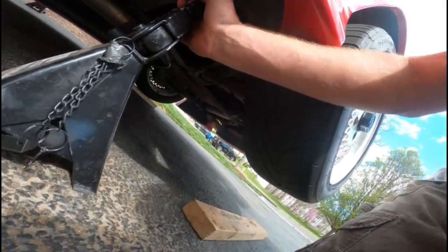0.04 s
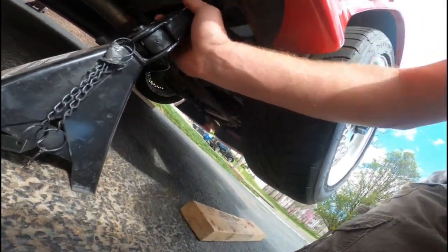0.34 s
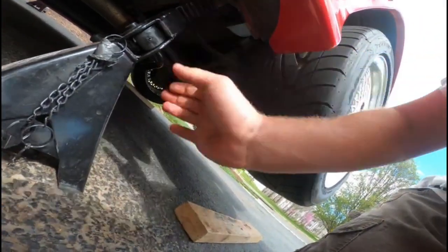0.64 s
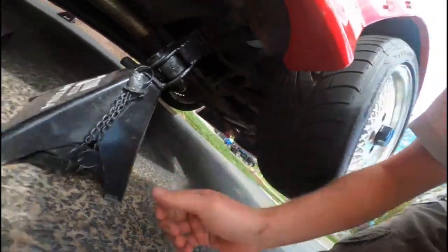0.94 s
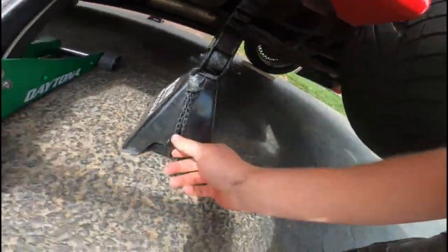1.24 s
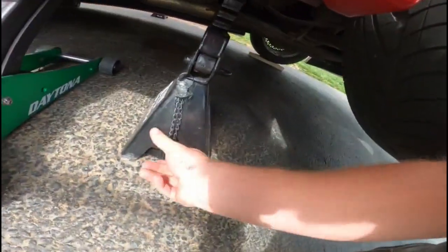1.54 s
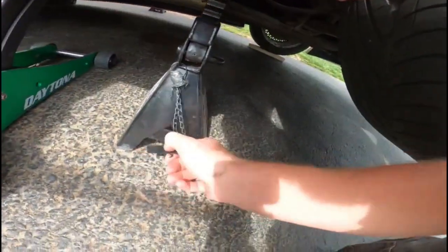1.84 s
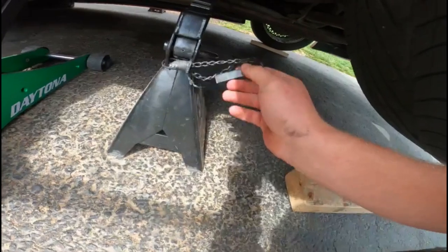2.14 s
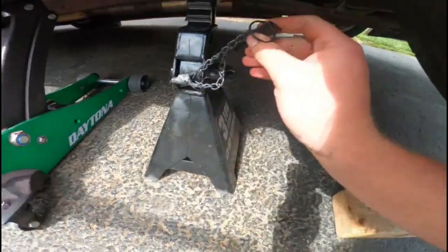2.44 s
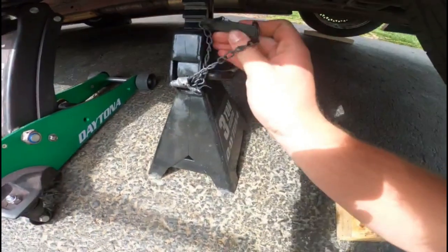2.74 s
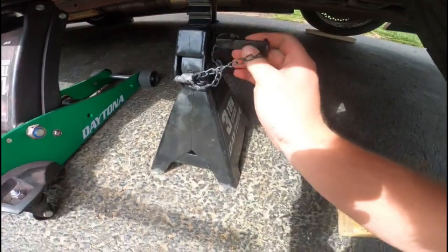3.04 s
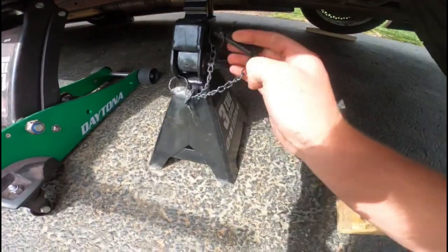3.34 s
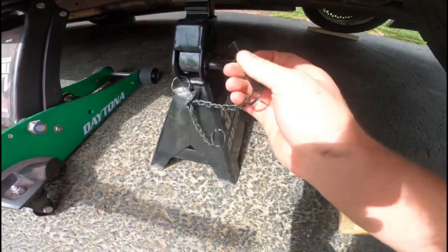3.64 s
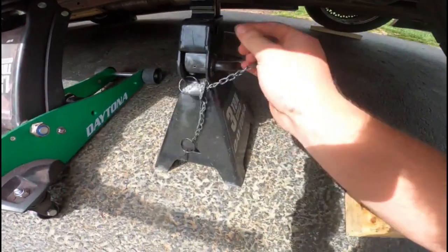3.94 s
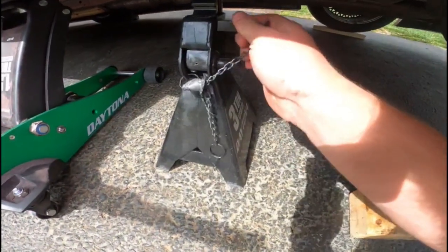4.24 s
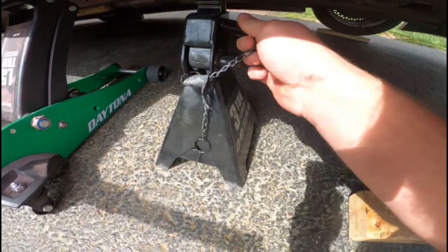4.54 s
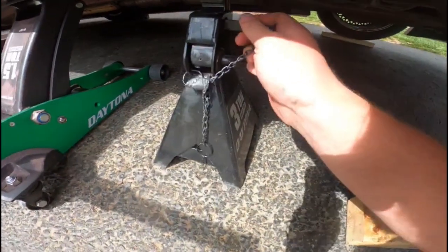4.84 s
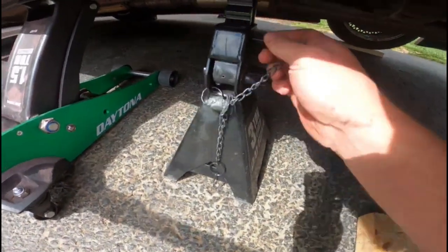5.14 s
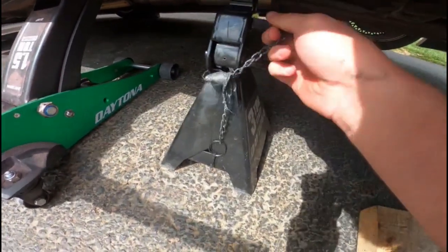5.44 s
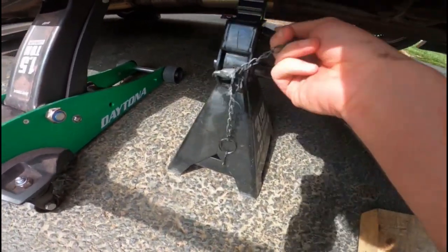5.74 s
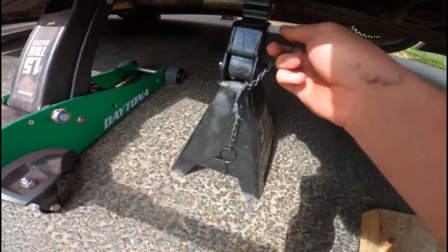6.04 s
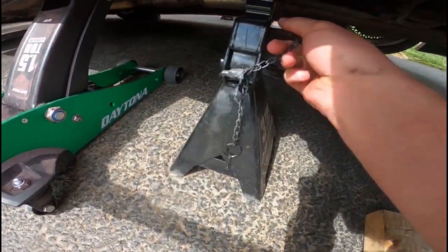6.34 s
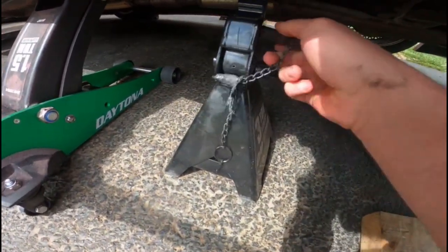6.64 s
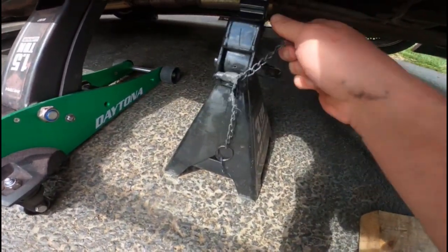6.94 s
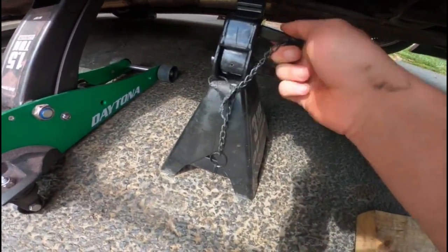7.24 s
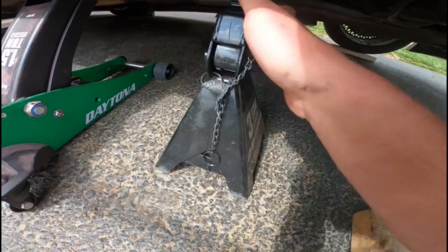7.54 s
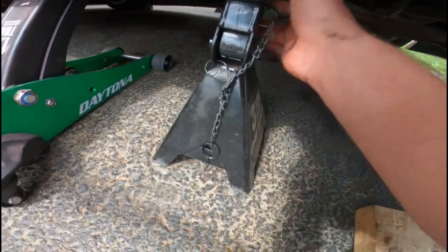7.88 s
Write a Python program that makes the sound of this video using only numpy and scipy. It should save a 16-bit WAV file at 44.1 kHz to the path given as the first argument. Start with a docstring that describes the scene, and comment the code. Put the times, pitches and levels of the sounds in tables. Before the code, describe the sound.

A steel stand clanks, then its chain jingles and a metal pin taps and scrapes into place over a low outdoor rumble.

```python
"""Pinning a steel jack stand

Under a car in a driveway, a ratchet post clanks into place; a hand then picks up the locking pin on its
chain and works it into the hole in the post. Each impact excites damped modes, and chain, pin and post
all ring the same sheet-steel base. Beneath lie a low rumble, a faint hiss and puffs of wind."""
import sys
import numpy as np
from scipy import signal
from scipy.fft import rfft, irfft, next_fast_len
from scipy.io import wavfile

SR = 44100
rng = np.random.default_rng(int(sys.argv[2]) if len(sys.argv) > 2 else 0)


def master_out(mix):
    """Clip the mix to full scale and print it as 16-bit PCM to the path in sys.argv[1]."""
    frames = np.transpose(np.atleast_2d(mix))
    ceiling = np.clip(frames, -1, 1)
    pcm = np.round(ceiling * 32767).astype(np.int16)
    wavfile.write(sys.argv[1], SR, pcm)


N = 348831
RING_N, ATTACK_N = 2 ** 15, SR // 40  # samples in one ring and in its attack
AGE = np.arange(RING_N) / SR  # seconds since a contact
TAP_REFERENCE_DB = -28

# Spectra of the background noises. Each row: frequency in Hz, relative spectral density in dB.
RUMBLE_SPECTRUM = [(25, -12.5), (45, -3.5), (70, -0.5), (95, -1.5), (128, 0.5), (215, -4.5), (300, -13.5),
                   (500, -22.5), (800, -39.5), (1500, -32.5), (3000, -89)]
HISS_SPECTRUM = [(300, -14), (600, -4), (1300, 0), (3000, 0), (5000, -6), (8000, -20), (12000, -32),
                 (16000, -58)]
WIND_SPECTRUM = [(10, -5.5), (28, -5.5), (45, 5), (80, -9), (200, -66)]
# The slow envelope of the rumble. Each row: time in seconds, relative level in dB.
RUMBLE_LEVELS = [(0.0, -37.5), (0.51, -47), (1.01, -44.5), (1.21, -42), (4.1, -40), (4.52, -46),
                 (7.25, -39.5), (7.91, -43.5)]
# Preset dips and recoveries of the hiss, like an automatic gain's. Each row: time in seconds, level in dB.
HISS_LEVELS = [(0, -68.5), (.6, -70.5), (1.3, -69.5), (2.15, -52), (3.35, -65.5), (3.7, -55), (5.4, -60.5),
               (5.62, -51), (5.85, -52), (6.1, -55), (7.1, -55.5), (7.9, -53)]

# Normal modes. Each row: frequency in Hz, relative level in dB, 60 dB decay time in seconds.
BASE_MODES = [(505, -20, .12), (620, -13, .07), (1065, -12.5, .48), (1133, -8.5, .28), (1272, -18, .16),
              (1480, -12, .18), (1541, -6, .16), (1612, -11, .18), (1805, -7, .2), (1905, -14, .2),
              (2141, -8, .28), (2351, -11.5, .32), (2482, -10, .32), (2640, -15, .14), (2995, -12, .14),
              (3102, -6, .22), (3300, -16, .15), (3445, -12, .18), (3522, 2, .27), (3590, -10, .16),
              (3925, -7, .17), (4030, -9, .2), (4344, -16, .18), (4510, -15, .42), (4759, -15, .2),
              (5211, -13, .2), (5655, -16, .25), (6100, -14, .14), (7040, -13, .22), (7248, -16, .14),
              (7968, -13, .12), (8317, -18, .14)]
PIN_MODES = [(1288.7, -16.5, 0.1477), (1392.2, -8.5, 0.0333), (1534.3, 1.5, 0.034), (1637.4, -8, 0.1099),
             (3579.6, -1.5, 0.0077), (3612, -0.5, .013), (4059.4, -6.5, 0.0806), (4086, -2.5, .03),
             (5129, -10, 0.043)]  # the hand-damped pin against the post
# The stand's crowd of short-lived modes. Each row: frequency in Hz, relative spectral density in dB.
CLATTER_SPECTRUM = [(50, -20), (140, -1), (290, -6), (400, -14), (500, -3), (610, 3), (850, -9), (1200, -1),
                    (1600, 0), (2200, -3), (3700, -3), (5300, -8), (8000, -15), (12000, -25), (16000, -44)]
# Their damping. Each row: frequency in Hz, 60 dB decay time in seconds.
CLATTER_DECAY = [(150, 0.208), (600, 0.2153), (1600, 0.077), (4000, 0.258), (12000, 0.12)]

# Impacts. Each row: start in seconds, rattle time in seconds, relative level in dB, tilt in dB per octave. The
# first chain row, at 0 s, is no fresh clink: the base is already ringing as the scene begins.
CHAIN_CLINKS = [(0, 0.00314, -52, -8), (1.396, 0.01484, -38, -8.5), (1.4568, 0.003144, -31.5, 3),
                (1.59, 0.0046, -28, -1), (1.6887, 0.00489, -32.5, -3.5), (1.881, .004, -41, -7.5),
                (2.314, 0.00491, -32, -3), (2.395, .005, -46, -5.5), (2.455, .01, -37.5, 2),
                (2.514, 0.0069, -49, -2.5), (2.663, 0.00736, -37, 7.5), (2.687, 0.0067, -42, 4.5),
                (2.719, 0.016, -47.5, 4.5), (2.765, .009, -49.5, 10.5), (2.862, .005, -47, -4),
                (2.929, 0.00847, -51.5, -2), (3.032, .012, -53, 0), (3.101, 0.011, -47.5, 0),
                (3.162, .01, -45, 4), (3.471, 0.00573, -47.5, 11), (3.508, 0.01202, -46.5, 2.5),
                (3.592, 0.0054, -48.5, 3), (3.667, 0.00682, -43.5, 2), (3.72, .019, -39, -1),
                (3.7877, .004, -28.5, 4.5), (3.818, 0.0109, -38, -6), (3.845, 0.01127, -39.5, -1),
                (3.94, 0.00718, -40.5, -1), (3.963, 0.0091, -37, -0.5), (4.011, 0.0067, -41.5, -3),
                (4.069, .009, -38, 0.5), (4.109, .016, -35, -1), (4.339, 0.0051, -45, -7),
                (4.516, 0.0077, -51, 2), (4.827, 0.0123, -40, -6.5), (5.08, 0.01003, -40.5, -4.5),
                (5.519, .007, -48.5, 0), (5.768, 0.0117, -55, 4), (6.281, 0.00516, -51.5, 10),
                (6.635, .02, -50, -1.5), (7.199, 0.00815, -51, -2), (7.318, .008, -48, 3),
                (7.352, .007, -49.5, -5.5), (7.45, 0.012, -50.5, 2.5), (7.528, 0.00303, -37, 8.5)]
POST_CLANKS = [(.177, 0.0073, -28.5, -2.5), (.234, 0.0119, -29, 3), (0.2493, 0.0041, -18, 1),
               (0.2549, 0.0041, -14.5, 0.5), (.267, 0.0074, -30, 4.5), (.317, 0.027, -43, 3),
               (2.492, 0.00616, -29, -2), (3.073, 0.00975, -44, -0.5)]
HANDLE_BUMPS = [(1.376, 0.01034, -31, -2), (1.4303, 0.0079, -18.5, 0.5), (1.74, 0.00455, -15, 2.5),
                (1.791, 0.01685, -23, -2), (1.83, 0.00437, -24, -4.5), (1.894, 0.00662, -28, 0.5),
                (6.681, 0.000964, -38.5, 8), (6.924, 0.0048, -24.5, 2.5), (7.536, .0095, -23.5, 4.5)]
PIN_SHOVES = [(6.266, .01, -34.5, -1.5), (6.782, .013, -19.5, -1), (6.85, .0063, -21, -1),
              (6.932, 0.0052, -21, 2), (7.59, .01, -26.5, 0), (7.62, 0.00834, -25, 4)]
# Edges of the frequency bands in which impacts are coloured, in Hz.
CHAIN_BANDS = [950, 2800, 4800, 9000]
STAND_BANDS = [90, 380, 950, 1300, 2000, 2800, 4800, 9000, 14000]
TAP_BANDS = [380, 1000, 2000, 3000, 4800, 9000, 14000]
# Relative level in dB per band: of CHAIN_BANDS for clinks, of STAND_BANDS for the rest.
CLINK_COLOUR = [-1.5, -0.5, -1]
CLANK_COLOUR = [-2, 2.5, -7.5, -0.5, -5, -4, -13, -32]
BUMP_COLOUR = [-31.5, -8.5, -6, -1.5, -6, -4.5, -21, -43.5]
SHOVE_COLOUR = [-10, -9, -0.5, -3.5, -12.5, -16, -23, -38.5]
# Taps on the post. Each row: start in seconds, strength in dB, emphasis of the high tone in dB.
POST_TAPS = [(.18, -27.5, -16.5), (0.213, -30.5, -15.5), (.351, -35.5, -14), (2.3158, -28, 3),
             (2.799, -33.5, -11), (2.8103, -15.5, -12), (3.458, -47.5, 10.5), (4.1548, -19, 3.5),
             (4.302, -18, -15), (4.446, -26.5, 2.5), (4.757, -36.5, -14), (4.783, -30.5, -14.5),
             (4.811, -30, -11), (4.9683, -17, -3), (5.0602, -27, .5), (5.1916, -37, -11),
             (5.4438, -19, -11), (5.4913, -33.5, -10.5), (5.916, -42.5, -3.5), (5.948, -34, -4.5),
             (6.137, -54, -12), (6.278, -35.5, -10.5), (6.3867, -26, 4.5), (7.113, -55, -3),
             (7.287, -47.5, 3)]
# The bands of a tap. Each row: relative level in dB at the reference strength, dB gained per dB of
# strength, share of the high-tone emphasis.
TAP_COLOUR = [(-43.5, 0.18, 0), (-27.5, 1, 0.0012), (-38, 0.5637, 0.277), (-27.5, 1, 0.94),
              (-40, 0.5139, 0.827), (-68, 0.24, 0.95)]
# Lingering modes of the base. Each row: start in seconds, frequency in Hz, level in dB.
SINGING_MODES = [(.267, 3522, -38), (1.4565, 3522, -28.5), (1.59, 3543, -20.5), (1.59, 2141, -35),
                 (2.315, 3024, -41), (2.811, 2359, -32), (3.033, 1064, -35.5), (3.7871, 3102, -34),
                 (3.845, 1065, -30), (4.01, 1065, -28.5), (4.109, 4510, -27.5), (4.155, 1060, -29.5),
                 (4.156, 3102, -32.5), (4.302, 2351, -33.5), (4.302, 1062, -38.5), (4.444, 1085, -34.5),
                 (4.7836, 1084, -28.5), (4.811, 2470, -34.5), (4.9671, 3092, -29.5), (5.0605, 1081, -33),
                 (5.1928, 1086, -40.5), (5.4911, 1069, -35.5), (5.948, 2481, -31), (5.95, 1073, -34.5),
                 (6.139, 2490, -43.5), (7.114, 2480, -42), (7.286, 2481, -36)]

# Swells. Each row: peak time in seconds, relative level in dB, seconds to fade 20 dB (sign ignored).
CHAIN_SHAKES = [(1.62, -32, 0.2), (2.17, -44, 0.34), (2.7, -28, 0.0128), (3.16, -41, 0.11),
                (3.48, -37, 0.1), (3.76, -31.5, 0.1369), (4.1, -61.5, -1.6), (4.85, -61, -0.25),
                (7.38, -44.5, 0.22)]
PIN_STROKES = [(3.15, -38, 0.11), (4.85, -42, 0.4), (5.27, -46, 0.36), (6.24, -43, .2), (7.58, -40, 0.1586)]  # the pin is pushed and twisted in its hole
WIND_GUSTS = [(3.72, -34, 0.83), (5.17, -34, 0.31), (5.65, -42.5, 2)]


def amp(db):
    """Amplitude grows tenfold for every 20 dB."""
    return 10 ** (np.asarray(db) / 20)


def unit(x, first_n=None):
    """Normalisation to rms 1, taken over the whole signal or its first samples."""
    return x / np.sqrt(np.mean(x[..., :first_n] ** 2) + 1e-20)


def along(points, hz):
    """Interpolation of (Hz, value) points on a logarithmic frequency axis."""
    freqs, values = np.transpose(points)
    return np.interp(np.log(hz + 1), np.log(freqs + 1), values)


def envelope(rows):
    """A gain that moves linearly in decibels between the given times."""
    times, db = np.transpose(rows)
    return amp(np.interp(np.arange(N) / SR, times, db))


def swells(rows):
    """An envelope that follows the strongest of several rising and fading swells."""
    t = np.arange(N) / SR
    roundness = 1.247  # 1 is a sharp peak, 2 a bell
    return np.max([amp(db - 20 * abs((t - s) / fade_s) ** roundness) for s, db, fade_s in rows], axis=0)


def add(track, start_s, x):
    """Superposition: x adds to the track from its start time."""
    part = track[:, max(0, round(start_s * SR)):][:, :x.shape[1]]
    part += x[:, :part.shape[1]]


def filtered(x, response):
    """Linear filtering multiplies the spectrum by a frequency response."""
    size = next_fast_len(x.shape[-1] + SR // 8)
    return irfft(rfft(x, size) * response(np.fft.rfftfreq(size, 1 / SR)), size)[..., :x.shape[-1]]


def noise(spectrum, side_db):
    """Partly coherent stereo noise of rms 1: a common signal plus and minus a side signal."""
    mid, side = filtered(rng.standard_normal((2, N)), lambda hz: amp(along(spectrum, hz)))
    return unit(np.array([mid + amp(side_db) * side, mid - amp(side_db) * side]))


def width(hz):
    """Two points in a sound field differ more as the wavelength shrinks."""
    return np.minimum(0.046 + 0.39 * (hz / 10000) ** 0.74, 1)


def partials(modes, swell_cycles):
    """Free vibration: a damped sine per mode, with a brief build-up. Returns a body, (waves, Hz)."""
    hz, db, t60 = np.transpose(modes)[:, :, None]
    swell = 1 - np.exp(-AGE * hz / swell_cycles)
    return swell * amp(db - 60 * AGE / t60) * np.sin(2 * np.pi * hz * AGE), hz[:, 0]


def damped(body, extra_t60_s):
    """Contact damping: a body that is pressed on dies away sooner."""
    waves, hz = body
    return waves * amp(-60 * AGE / extra_t60_s), hz


def ring(body, scatter_db):
    """Modal excitation: each contact drives the modes at new strengths, a little different in each ear."""
    waves, hz = body
    size, sign, side = rng.standard_normal((3, len(hz)))
    strengths = amp(scatter_db * size) * np.sign(sign)
    ear_gains = 1 + np.outer([1, -1], side * width(hz))
    return unit((strengths * ear_gains) @ waves, ATTACK_N)


def clatter(crack_db, crack_s):
    """Overlapping modes merge into noise: a sharp crack, then a decay band by band."""
    hz, t, spectra = signal.stft(rng.standard_normal((2, RING_N // 2)), SR, nperseg=256)
    spectra *= amp(along(CLATTER_SPECTRUM, hz)[:, None] - 60 * t / along(CLATTER_DECAY, hz)[:, None])
    spectra[1] *= width(hz)[:, None]
    mid, side = signal.istft(spectra, SR, nperseg=256)[1]
    pair = np.pad([mid + side, mid - side], ((0, 0), (0, RING_N - len(mid))))
    crack = 1 + amp(crack_db) * np.exp(-AGE / crack_s)
    return unit(pair * crack, ATTACK_N)


def rattled(x, rattle_s, bounce, count):
    """Convolution with a first contact and random rebounds spread over 1.5 rattle times."""
    when, size = rng.random(count), rng.standard_normal(count)
    delays = (when * 1.5 * rattle_s * SR).astype(int)
    force = np.bincount(delays, bounce * size * (1 - when / 2))
    force[0] = 1
    return signal.fftconvolve(x, force[None], axes=1)[:, :RING_N]


def tilted(edges, colour_db, level_db, tilt):
    """Spectral tilt: a harder contact puts more of its energy into the upper bands."""
    octaves = np.log2(np.multiply(edges[:-1], edges[1:])) / 2
    db = np.add(colour_db, tilt * octaves)
    return level_db + db - 10 * np.log10(np.sum(amp(db) ** 2))


def voiced(x, edges, levels_db):
    """The place and hardness of a contact set the level of each band in the attack."""
    hz = np.fft.rfftfreq(RING_N, 1 / SR)
    attack = x.mean(0)[:ATTACK_N] * np.minimum(1, np.linspace(10, 0, ATTACK_N))
    power = 2 * abs(rfft(attack, RING_N)) ** 2 / (RING_N * ATTACK_N)
    points = []
    for lo, hi, db in zip(edges, edges[1:], levels_db):
        lift_db = db - 10 * np.log10(power[(hz >= lo) & (hz < hi)].sum() + 1e-20)
        points += [(lo * 1.08, lift_db), (hi / 1.08, lift_db)]
    points.insert(0, (edges[0] / 3.0, points[0][1] - 14))  # roll-off below the lowest band
    # minimum phase: nothing sounds before the contact
    cepstrum = irfft(np.log(amp(along(points, hz))))
    cepstrum[1:RING_N // 2] *= 2
    cepstrum[RING_N // 2:] = 0
    return irfft(rfft(x) * np.exp(rfft(cepstrum)))


def rumble():
    """Amplitude-modulated noise: a low outdoor rumble swells and ebbs."""
    return amp(2) * envelope(RUMBLE_LEVELS) * noise(RUMBLE_SPECTRUM, side_db=-18)


def hiss():
    """A faint hiss dips after loud clanks and creeps back, as with a recorder's automatic gain."""
    return envelope(HISS_LEVELS) * noise(HISS_SPECTRUM, side_db=-4.5)


def chain_modes():
    """Small bodies resonate high, and no two links alike: a crowd of modes, weaker toward the top."""
    hz = np.exp(rng.uniform(np.log(4400), np.log(15500), size=90))
    t60 = rng.uniform(.05, .17, size=90)
    db = along([(4600, 5.5), (7300, -0.5), (10000, -11.0), (13500, -15.5), (15500, -34.5)], hz)
    return np.transpose([hz, db, t60])


def chain_clinks(base, links):
    """Brief impacts excite high modes: hard links fall on each other and on the base."""
    track = np.zeros((2, N))
    for start_s, rattle_s, level_db, tilt in CHAIN_CLINKS:
        blow = ring(base, scatter_db=3) + amp(-5) * ring(links, scatter_db=7)
        blow += amp(-7.5) * clatter(crack_db=0, crack_s=.004)
        rattle = rattled(blow, rattle_s, bounce=0.307, count=9)
        levels_db = tilted(CHAIN_BANDS, CLINK_COLOUR, level_db, tilt)
        add(track, start_s, voiced(rattle, CHAIN_BANDS, levels_db))
    return amp(5.5) * track


def stand_knocks(base, rows, colour_db, ring_db):
    """Impulse response of the stand: struck by post, handle or pin, it clatters and the base rings on."""
    track = np.zeros((2, N))
    for start_s, rattle_s, level_db, tilt in rows:
        blow = clatter(crack_db=6, crack_s=0.011) + amp(ring_db) * ring(base, scatter_db=6)
        rattle = rattled(blow, rattle_s, bounce=0.284, count=6)
        levels_db = tilted(STAND_BANDS, colour_db, level_db, tilt)
        add(track, start_s, voiced(rattle, STAND_BANDS, levels_db))
    return amp(-3) * track


def post_taps(base, pin):
    """Coupled vibration: the pawl, and later the pin, taps the post; two tones leak into the base."""
    track = np.zeros((2, N))
    colour_db, growth, high_share = np.transpose(TAP_COLOUR)
    for start_s, strength_db, high_db in POST_TAPS:
        crack = amp(-12) * clatter(crack_db=7, crack_s=.004)
        blow = ring(pin, scatter_db=2.5) + crack + amp(-12) * ring(base, scatter_db=3)
        rattle = rattled(blow, rattle_s=.003, bounce=0.482, count=3)
        # the harder the tap, the more its tones stand out
        levels_db = colour_db + growth * (strength_db - TAP_REFERENCE_DB) + high_share * high_db
        add(track, start_s, voiced(rattle, TAP_BANDS, levels_db))
    return amp(-2.5) * track


def base_singing(t60_s=0.333):
    """Resonance: single modes of the base outlast the contact that excited them."""
    track = np.zeros((2, N))
    for start_s, hz, db in SINGING_MODES:
        add(track, start_s, partials([(hz, db, t60_s)], swell_cycles=4)[0])
    return track


def grains(response, per_second, spread_db):
    """Shot noise of rms 1: many tiny random contacts drive one ringing body."""
    contacts = rng.random(N) < per_second / SR
    force = contacts * amp(spread_db * rng.standard_normal(N)) * rng.choice([-1, 1], N)
    return unit(signal.fftconvolve(force[None], response, axes=1)[:, :N])


def rubbing(base, pin, links):
    """Friction as a stream of small impacts: shaken links tick together, the pin scrapes in the post."""
    pin_ring, base_ring, link_ring = (ring(body, scatter_db=1) for body in (pin, base, links))
    pin_tick = pin_ring + amp(-5) * base_ring + amp(-3.5) * clatter(crack_db=7, crack_s=.003)
    link_tick = link_ring + amp(-1.5) * base_ring
    scrape = grains(pin_tick, per_second=500, spread_db=5)
    jingle = grains(link_tick, per_second=130, spread_db=6)
    return amp(-3) * swells(PIN_STROKES) * scrape + amp(-9) * swells(CHAIN_SHAKES) * jingle


def wind():
    """Turbulence: puffs of breeze make slow pressure fluctuations at the microphones."""
    return amp(-2) * swells(WIND_GUSTS) * noise(WIND_SPECTRUM, side_db=-5)


def from_right(x, lag_s=2.6e-5):
    """Interaural differences: a source a little to the right reaches the left ear later and duller."""
    left_db = [(2500, 0.094), (5000, 1.0), (9000, -1.7), (13000, -1.5)]
    ears = np.array([[1], [-1]])

    def response(hz):
        phase = np.pi * np.minimum(hz, 6500) * lag_s  # half the lag in each ear
        return amp(ears * along(left_db, hz)) * np.exp(-1j * phase * ears)
    return filtered(x, response)


def scene():
    """Superposition: all the steel sounds from one place, over the background noise."""
    base = partials(BASE_MODES, swell_cycles=2.77)
    pin = partials(PIN_MODES, swell_cycles=2.27)
    links = partials(chain_modes(), swell_cycles=1.9)
    loaded_base = damped(base, extra_t60_s=0.72)  # the post or the pin's handle presses on it
    clanks = stand_knocks(loaded_base, POST_CLANKS, CLANK_COLOUR, ring_db=-1.5)
    bumps = stand_knocks(loaded_base, HANDLE_BUMPS, BUMP_COLOUR, ring_db=1)
    shoves = stand_knocks(base, PIN_SHOVES, SHOVE_COLOUR, ring_db=-2)
    steel = clanks + bumps + shoves + post_taps(base, pin) + chain_clinks(base, links)
    steel += base_singing() + rubbing(base, pin, links)
    return from_right(steel) + rumble() + hiss() + wind()


def record(dry, cutoff_hz=16000):
    """Band limiting: a steep low-pass removes the highest treble."""
    return filtered(dry, lambda hz: 1 / (1 + (hz / cutoff_hz) ** 120))


dry = scene()
out = record(dry)
master_out(out)
```